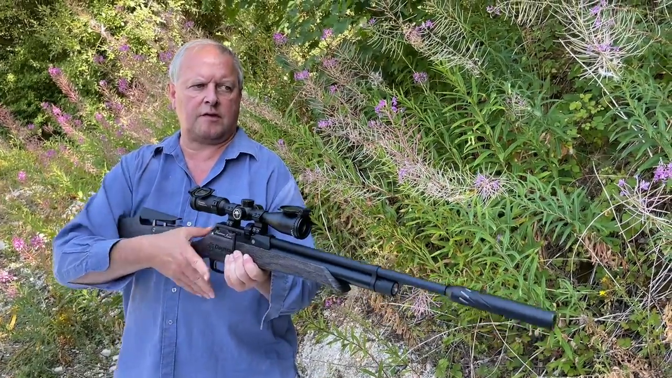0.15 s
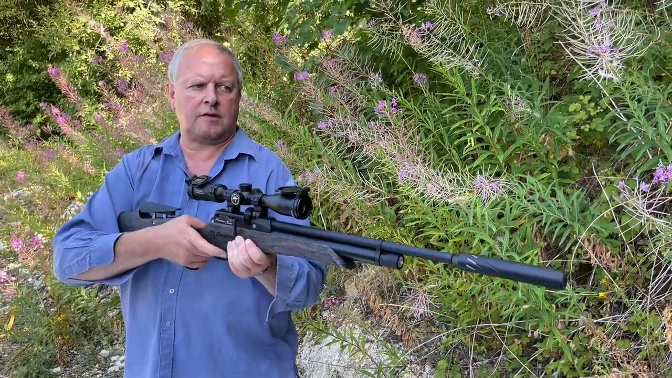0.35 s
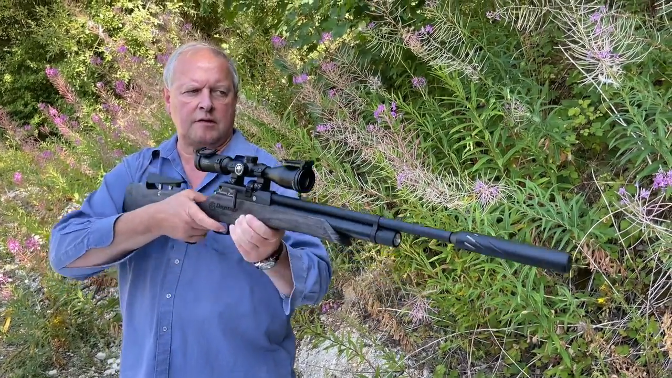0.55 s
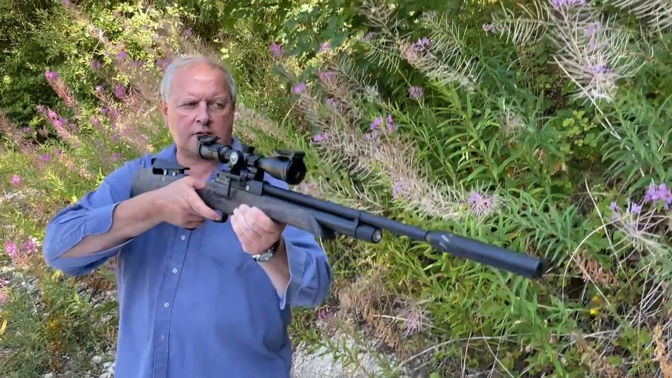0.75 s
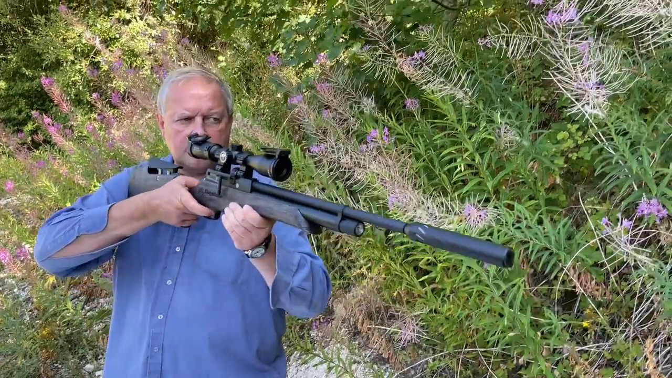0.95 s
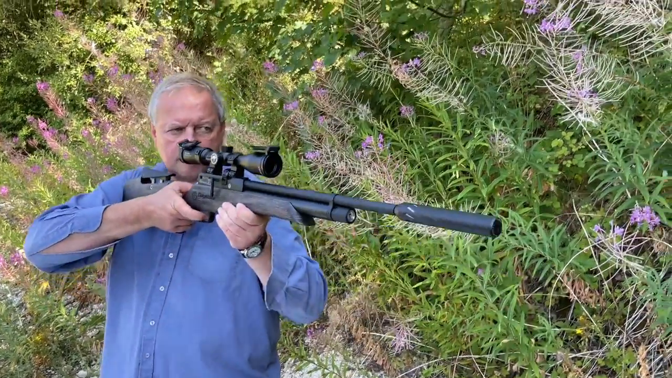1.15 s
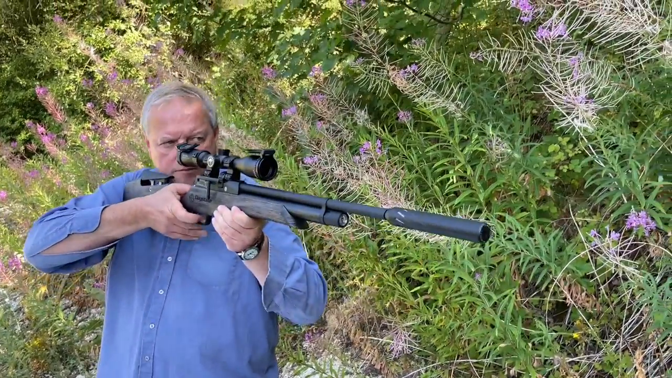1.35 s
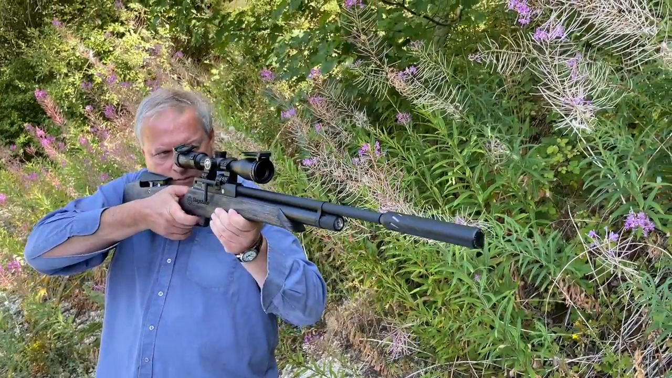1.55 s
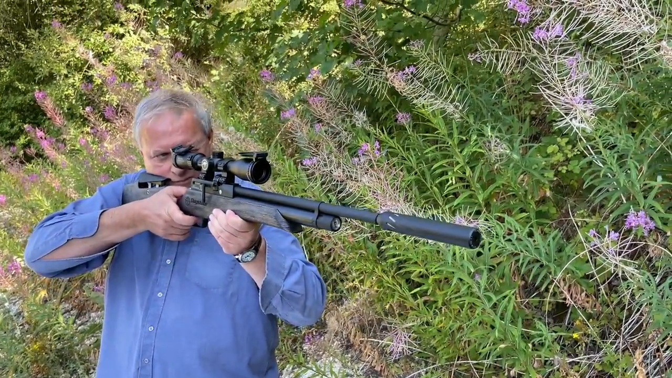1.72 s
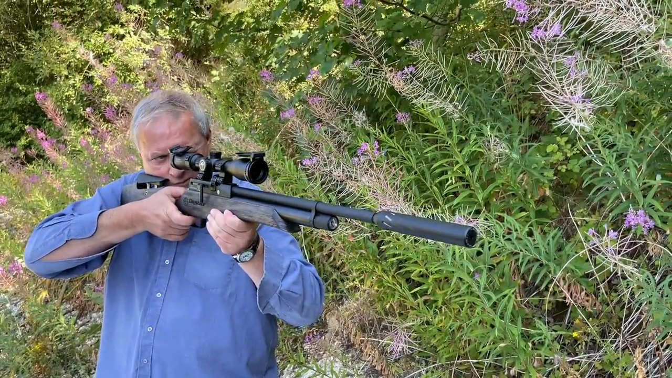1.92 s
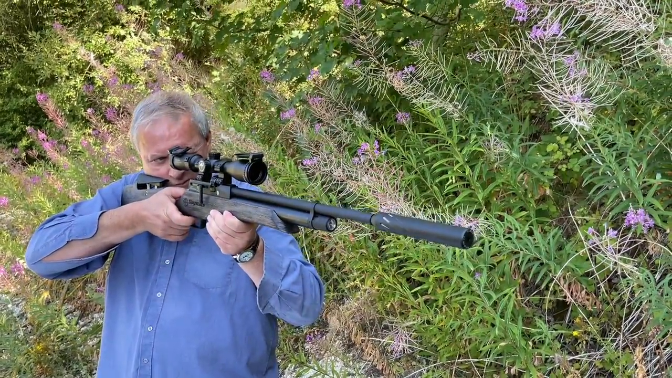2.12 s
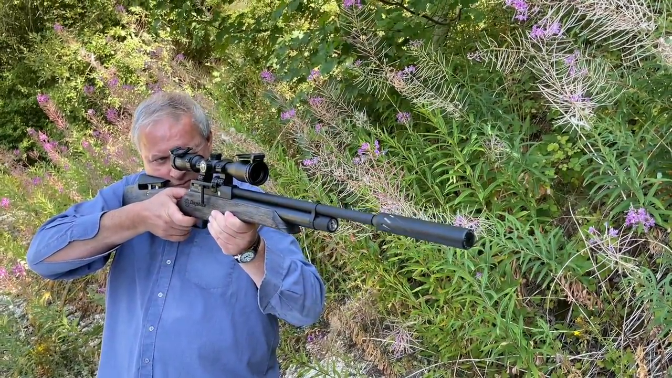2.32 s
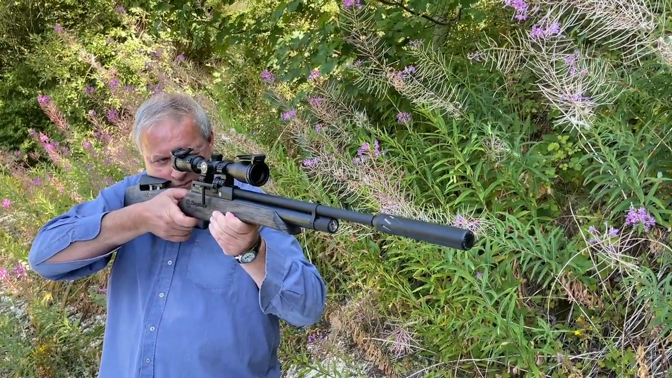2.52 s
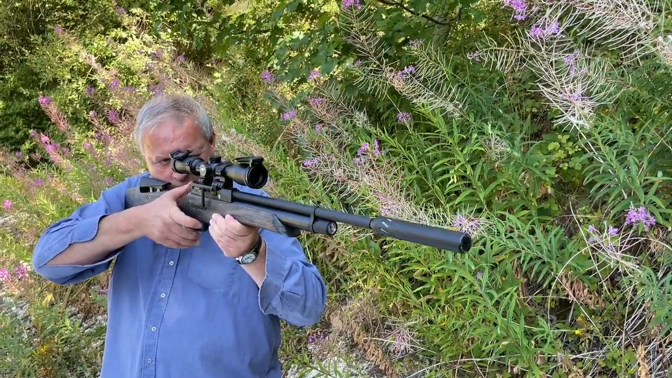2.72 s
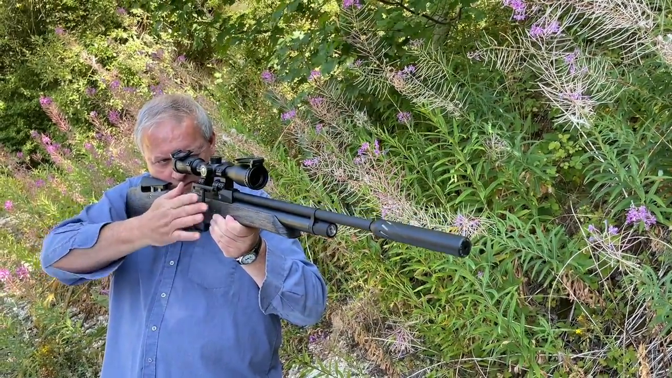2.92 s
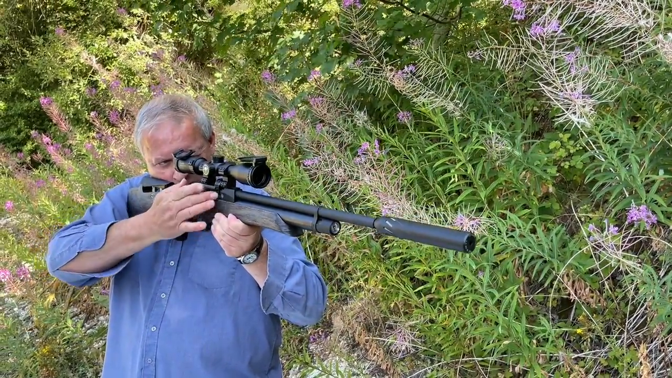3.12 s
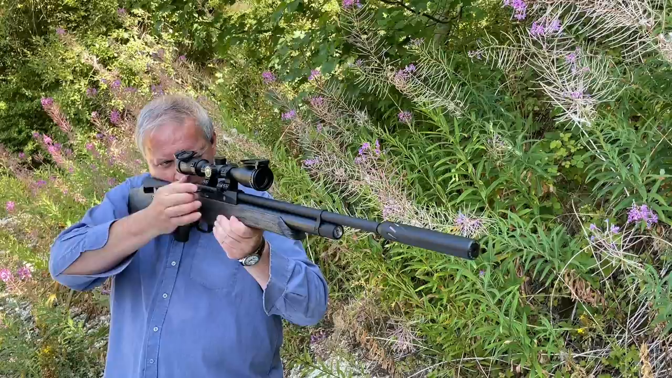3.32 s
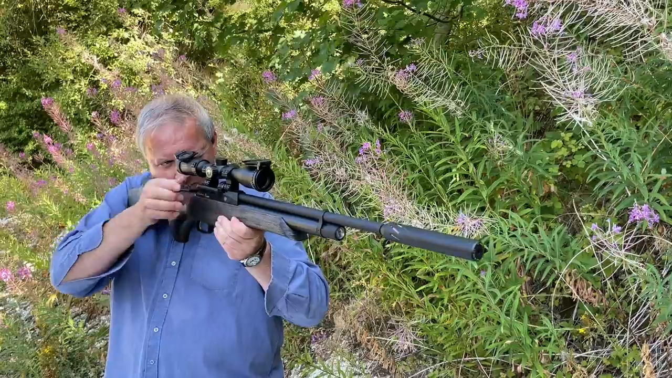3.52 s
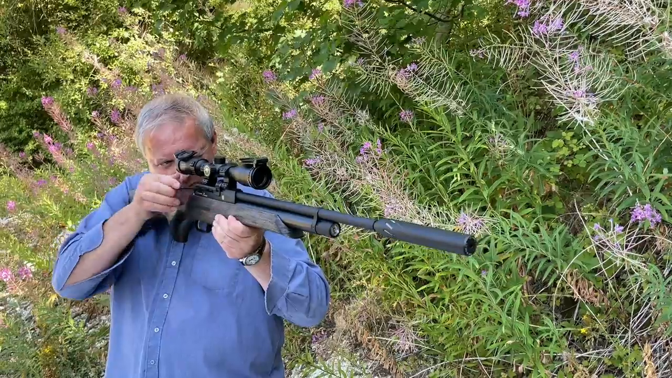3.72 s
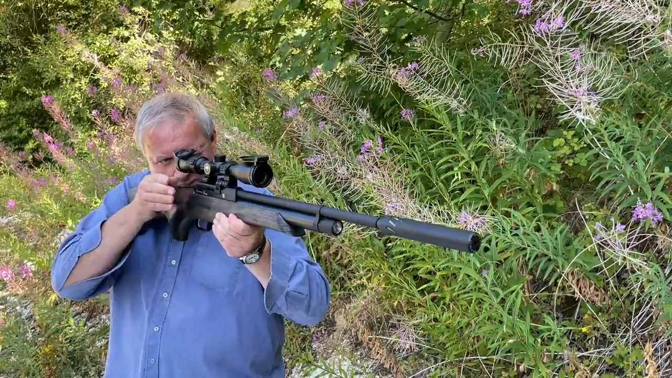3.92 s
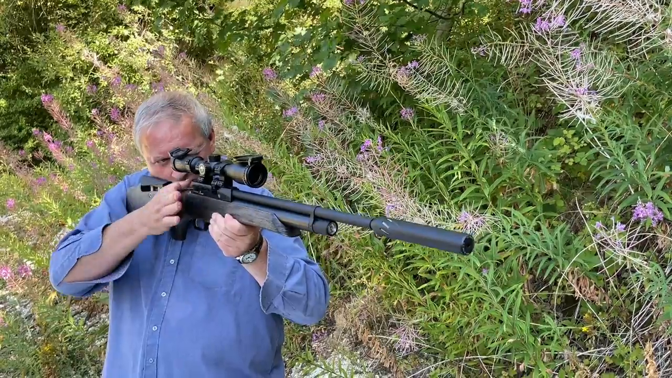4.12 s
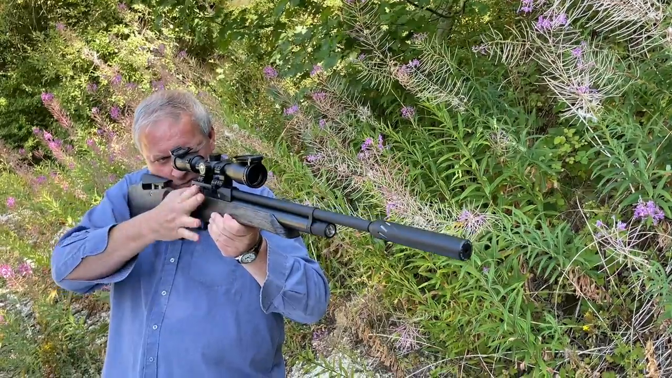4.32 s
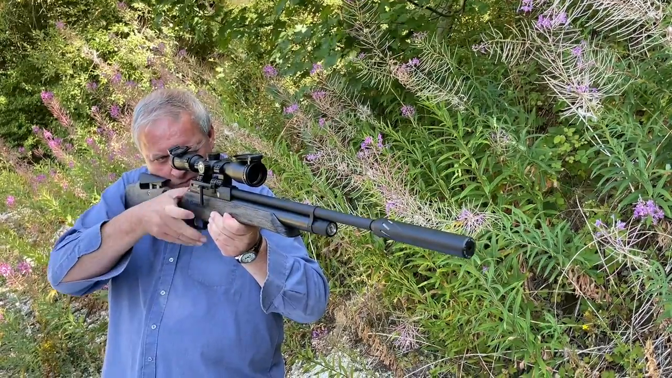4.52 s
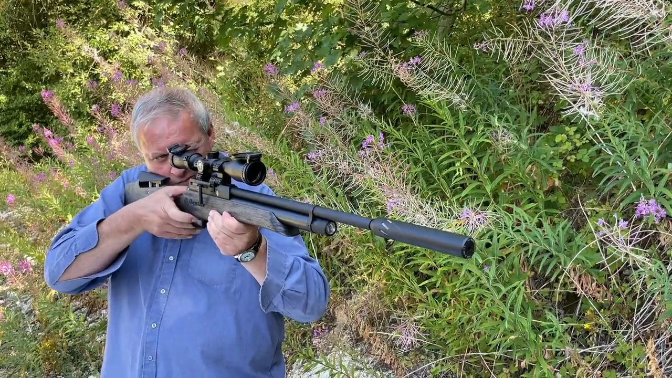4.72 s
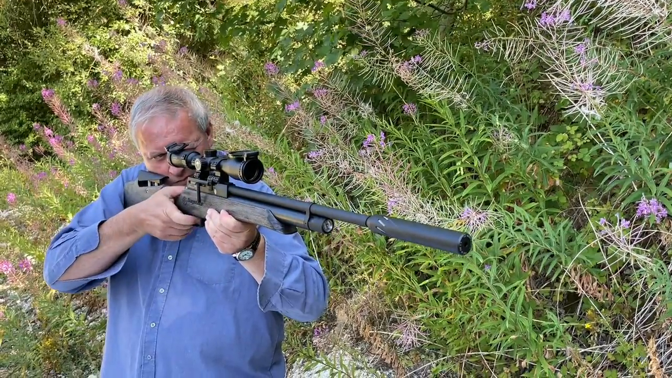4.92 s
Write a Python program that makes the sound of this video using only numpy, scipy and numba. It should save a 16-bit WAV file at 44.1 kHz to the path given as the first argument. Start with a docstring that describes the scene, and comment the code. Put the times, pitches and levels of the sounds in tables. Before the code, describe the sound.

A hard steel snap opens the scene, followed by near silence with light wind and a very faint low engine. At about 2.4 seconds a silenced air rifle fires once, a dense dry crack overloading the microphone, with venting air and a brief leafy wash. Then come rubbing bolt strokes, a cluster of clacks, small magazine clicks and a firm closing snap, outdoors in front of dense greenery.

```python
"""Before a bushy bank outdoors, a silenced air rifle is fired once, loud enough to clip.
Its side lever snaps shut at the start; after the shot it is drawn back, the magazine turns, and it is pushed home.
Contacts are noise pushes into resonances, strokes are grains with a gliding pitch, the shot is noise bursts
ringing a barrel; bushes and trees return washes of noise. Shaped noise is the light wind, and three
wandering harmonics are a far engine."""
import sys
import numpy as np
from scipy import signal
from scipy.fft import rfft, irfft, next_fast_len
from scipy.io import wavfile
from numba import njit

SR = 44100
rng = np.random.default_rng(int(sys.argv[2]) if len(sys.argv) > 2 else 0)


def write(x):
    x = np.atleast_2d(x).T
    wavfile.write(sys.argv[1], SR, np.round(np.clip(x, -1, 1) * 32767).astype(np.int16))


N = 223099
T = np.arange(N) / SR


def from_db(db):
    """Decibels to gain."""
    return 10 ** (np.asarray(db) / 20)


def rms_one(x):
    """Scale to rms 1."""
    return x / np.sqrt(np.mean(x ** 2) + 1e-20)


def at_hz(points, hz, axis=1):
    """Read a table column on a log-frequency axis."""
    points = np.array(points)
    return np.interp(np.log(hz + 1e-3), np.log(points[:, 0]), points[:, axis])


def cut(x, hz, kind, order=2):
    """Causal Butterworth filter."""
    edges_hz = np.clip(hz, 10, .47 * SR)
    sos = signal.butter(order, edges_hz, kind, fs=SR, output="sos")
    return signal.sosfilt(sos, x + 1e-18)


def noise(colour=None):
    """Noise, white or with a given spectrum at rms 1."""
    white = rng.standard_normal(N)
    if colour is None:
        return white
    size = next_fast_len(N)
    gain = from_db(at_hz(colour, np.fft.rfftfreq(size, 1 / SR)))
    return rms_one(irfft(rfft(white, size) * gain, size)[:N])


def noise_band(low_hz, high_hz):
    """Band-passed noise of rms 1."""
    return rms_one(cut(noise(), [low_hz, high_hz], "band"))


def swell(start_s, rise_s, t60_s, t=T):
    """A straight rise, then an exponential decay."""
    age = t - start_s
    return np.clip(age / rise_s, 0, 1) * from_db(-60 * np.maximum(age - rise_s, 0) / t60_s)


def flutter(depth_db, rate_hz):
    """A gain that wanders at random around 1."""
    return from_db(depth_db * rms_one(cut(noise(), rate_hz, "low")))


def resonate(x, modes):
    """Parallel two-pole resonances, each with peak gain 1 before its own level."""
    out = 0
    for hz, width_hz, db in modes:
        r = np.exp(-np.pi * width_hz / SR)
        poles = [1, -2 * r * np.cos(2 * np.pi * hz / SR), r * r]
        out = out + from_db(db) * (1 - r * r) / 2 * signal.lfilter([1, 0, -1], poles, x + 1e-18)
    return out


@njit
def glide(x, angle, r):
    """A resonance whose centre moves sample by sample."""
    y = np.zeros(len(x))
    for i in range(2, len(x)):
        drive = (1 - r * r) / 2 * (x[i] - x[i - 2])
        y[i] = drive + 2 * r * np.cos(angle[i]) * y[i - 1] - r * r * y[i - 2]
    return y


# wind and leaf spectrum: (frequency [Hz], density [dB per Hz, relative])
AIR_COLOUR = [(8, -8.5), (14, 6), (24, -6.5), (37, -16.5), (58, -10), (100, -23), (190, -32.5),
              (330, -37.5), (550, -42.5), (1000, -42.5), (2100, -48.5), (6000, -53), (15500, -56.5)]
# breeze strength, used relative to its median: (time [s], level [dB])
BREEZE = [(0.2, -66.5), (2.1, -71.5), (2.42, -69.5), (2.93, -70), (3.8, -69.5), (5.0, -71)]
AIR_DB = -63.5  # level above 180 Hz at median breeze


def outdoors(air_db=0, gust_share=.6):
    """Wind rumble and leaf hiss follow a share of the breeze's swing in dB."""
    time_s, breeze_db = np.transpose(BREEZE)
    gust_db = gust_share * np.interp(T, time_s, breeze_db - np.median(breeze_db))
    air = noise(AIR_COLOUR)
    hiss_rms = np.std(cut(air, 180, "high", order=6))
    return air * from_db(AIR_DB + air_db + gust_db) / hiss_rms


# engine level, one list before the shot and one after: (time [s], level [dB])
ENGINE_LEVEL = [
    [(0.1, -60), (1.07, -78), (1.28, -65.5), (2.3, -66.5)],
    [(2.6, -63.5), (3.67, -67.5), (4.33, -55.5), (5.0, -70)],
]
# engine harmonics: (harmonic [number], level [dB, relative])
ENGINE_ORDERS = [(1, -6), (2, 0.5), (3, -8.5)]
ENGINE_HZ, ENGINE_WANDER_HZ, ENGINE_WANDER_S = 81.8, 0.31, 0.26


def engine(level_db=0):
    """A far engine at nearly steady speed hums on three harmonics and fades in and out."""
    knots_s = np.arange(0, T[-1] + 1, ENGINE_WANDER_S)
    wander = np.interp(T, knots_s, noise()[:len(knots_s)])
    phase = 2 * np.pi * np.cumsum(ENGINE_HZ + ENGINE_WANDER_HZ * wander) / SR
    hum = sum(from_db(db) * np.sin(round(k) * phase + rng.uniform(0, 2 * np.pi))
              for k, db in ENGINE_ORDERS)
    fade_db = np.interp(T, *np.vstack(ENGINE_LEVEL).T)
    return np.sqrt(2) * from_db(level_db + fade_db) * hum


# shot returned by farther trees: (time [s], level [dB], rise [s], t60 [s])
ECHOES = [(2.46, -49.5, 0.048, 0.68), (2.71, -75, 0.047, 0.26)]
# echo spectrum: (frequency [Hz], level [dB, relative])
ECHO_COLOUR = [(300, -21), (900, 2), (2000, 1), (4000, 5), (8500, 6), (11000, 1.5), (16000, -16)]


def trees(patchy_db=2.0):
    """Distant foliage returns the shot as an uneven noise wash that has lost its top."""
    wash = sum(from_db(db) * swell(s, rise_s, t60_s) for s, db, rise_s, t60_s in ECHOES)
    return wash * noise(ECHO_COLOUR) * flutter(patchy_db, 64)


# scatter from the bushes: (frequency [Hz], level [dB, relative], t60 [s])
BUSHES = [(200, -7, 0.18), (810, 0, 0.23), (2000, -5, 0.21), (4860, -2, 0.21), (8356, 1, 0.27),
          (16185, -4.5, .19)]


def bushes(x, near_db=-10, near_t60_s=0.031, far_db=-15, far_rise_s=0.0017):
    """Ground gives a quick dense echo; stirring leaves return each band's energy as a dying wash."""
    t = T[:SR // 2]
    ground = cut(rng.standard_normal(len(t)), 12000, "low") * swell(0.0018, 0.0025, near_t60_s, t)
    out = from_db(near_db) * signal.fftconvolve(x, ground / np.linalg.norm(ground))[:N]
    edges_hz = np.geomspace(200, 16000, 13)
    for low_hz, high_hz in zip(edges_hz, edges_hz[1:]):
        mid_hz = np.sqrt(low_hz * high_hz)
        decay = swell(0.0082, far_rise_s, at_hz(BUSHES, mid_hz, axis=2), t) ** 2  # energy
        band_energy = cut(x, [low_hz, high_hz], "band") ** 2
        energy = signal.oaconvolve(band_energy, decay / decay.sum())[:N]
        gain = from_db(far_db + at_hz(BUSHES, mid_hz))
        out += gain * np.sqrt(np.abs(energy)) * noise_band(low_hz, high_hz)
    return out


# finger ticks on the gun: (time [s], level [dB], frequency [Hz], t60 [s])
TICKS = [(0.141, -54, 8900, 0.0053), (1.147, -43, 4580, 0.0084)]
# soft handling bumps: (time [s], level [dB], frequency [Hz], t60 [s])
BUMPS = [(0.205, -43, 117, 0.13), (3.535, -41.5, 107, 0.13)]


def handling(rows, spread=1.12):
    """Damped touches, each a narrow noise band that dies fast."""
    return sum(from_db(db) * noise_band(hz / spread, hz * spread) * swell(s, t60_s / 10, t60_s)
               for s, db, hz, t60_s in rows)


# stock, action and air tube: (frequency [Hz], width [Hz], level [dB, relative])
RIFLE_MODES = [(390.6, 35, -2.5), (669, 130, -6), (773, 70, 2), (1174, 1000, -5.5), (1394, 260, 5.5),
               (1642, 110, 0), (1843, 220, -1), (2350, 110, -6), (2790, 310, -1.5), (3230, 300, -1),
               (3975, 460, -6), (4790, 1200, 1), (5470, 680, -2), (6080, 350, -2), (7900, 710, 0),
               (8300, 480, -3.5), (8950, 870, 1)]
# small springs in the action: (frequency [Hz], width [Hz], level [dB, relative])
SPRING_MODES = [(9200, 90, -10), (11090, 28, 6), (11260, 50, 1), (13400, 140, -4)]
# hand strokes, lever gripped, lifted, bolt drawn back, cocked, pushed home:
# (start [s], end [s], level [dB], mid-stroke rub pitch [Hz])
SLIDES = [(3.068, 3.149, -64, 1700), (3.188, 3.255, -57, 1692), (3.309, 3.452, -51.5, 1816),
          (3.561, 3.64, -48, 1630), (3.99, 4.23, -58, 3300)]
# rub spectrum: (frequency [Hz], level [dB, relative])
SLIDE_COLOUR = [(400, -16), (1000, -2.5), (1650, 4.5), (2100, 3.5), (3000, 4.5), (5500, 3), (9000, -5.5),
                (12000, -12), (16000, -15)]
STROKE_ATTACK_S, STROKE_RELEASE_S, STROKE_REST_HZ = 0.023, .025, 1547


def slides(level_db=0.0, grit_db=1.5, catch_db=3.0, spring_db=8, spring_flutter_db=3, pitch_db=3,
           pitch_width_hz=450):
    """The bolt rubs its guide in grains; pitch arches per stroke, strong strokes favour the springs."""
    grains = noise(SLIDE_COLOUR) * flutter(grit_db, 241) * flutter(catch_db, 34)
    speed, hz = 0, STROKE_REST_HZ
    for start_s, end_s, db, mid_hz in SLIDES:
        attack = np.clip((T - start_s) / STROKE_ATTACK_S, 0, 1)
        release = np.clip(1 - (T - end_s) / STROKE_RELEASE_S, 0, 1)
        speed = speed + from_db(db) * attack * release
        arch = np.sin(np.pi * np.clip((T - start_s) / (end_s - start_s), 0, 1)) ** 2
        hz = hz + (mid_hz - STROKE_REST_HZ) * arch
    pitched = glide(grains, 2 * np.pi * hz / SR, np.exp(-np.pi * pitch_width_hz / SR))
    shake = grains * flutter(spring_flutter_db, 25) * speed / speed.max()
    springs = resonate(shake, SPRING_MODES)
    body = resonate(grains, RIFLE_MODES)
    rub = rms_one(body + from_db(pitch_db) * pitched + from_db(spring_db) * springs)
    return from_db(level_db) * speed * rub


# lever, bolt and magazine contacts; hard = steel on steel, soft = a stop against the stock:
# (time [s], level [dB, relative], hardness [dB], spring ring [dB, relative])
CONTACTS = [(0.0028, -9.5, 1, -28.5), (3.119, -56, 8, -6), (3.2325, -44.5, -0.5, -20), (3.4279, -41, 9, 7),
            (3.4465, -26, -8, -25), (3.6186, -28, 10.5, -6), (3.6355, -22.5, 8.5, -26),
            (3.6466, -26, -9.5, -26), (3.8567, -41, 6, -23), (3.862, -30, -14, -26),
            (3.9224, -44.5, -4.5, -20), (3.9491, -47.5, -1.5, -21), (3.981, -45, 10, 7),
            (4.0185, -42.5, -1.5, -11), (4.0705, -42, 2.5, -3), (4.2327, -13, 5.5, -25)]
# rattle t60 at the reference level; it doubles for each further drop of RATTLE_DOUBLES_DB
RATTLE_S, RATTLE_AT_DB, RATTLE_DOUBLES_DB = .018, -25.5, 45
# struck part: pitch at hardness 0, hardness per octave
PART_HZ, PART_OCTAVE_DB = 2270, 12.5
REBOUND_S, REBOUND_DB = .007, -17.5


def contacts(level_db=4, knock_db=9, spring_db=12, part_db=-1, part_width_hz=320, crack_db=-13,
             rise_s=0.00065, thud_db=-2, steel_db=-5, thud_hz=1500, steel_hz=4200, top_hz=13000):
    """Knock, rattle and one rebound; soft contacts move the stock, hard ones the steel."""
    force, springs, parts = np.zeros((3, N))
    t = T[:SR // 8]
    for s, db, hard_db, ring_db in CONTACTS:
        rattle_s = RATTLE_S * 2 ** ((RATTLE_AT_DB - db) / RATTLE_DOUBLES_DB)
        envelope = swell(0, rise_s, rattle_s, t)
        envelope += from_db(REBOUND_DB) * swell(REBOUND_S, rise_s, rattle_s, t)
        push = rng.standard_normal(len(t)) * envelope
        push[round(rise_s * SR)] += from_db(knock_db)
        push *= from_db(db)
        span = slice(round(s * SR), round(s * SR) + len(t))
        force[span] += from_db(thud_db - hard_db) * cut(push, thud_hz, "low", order=1)
        force[span] += cut(push, [thud_hz, steel_hz], "band", order=1)
        force[span] += from_db(steel_db + hard_db) * cut(push, steel_hz, "high", order=1)
        part_hz = PART_HZ * 2 ** (hard_db / PART_OCTAVE_DB)
        parts[span] += resonate(push, [(part_hz, part_width_hz, part_db)])
        springs[span] += from_db(ring_db) * push
    body = cut(resonate(force, RIFLE_MODES) + parts + from_db(crack_db) * force, top_hz, "low")
    return from_db(level_db) * body + from_db(spring_db) * resonate(springs, SPRING_MODES)


def spring_song(level_db=-24, hz=11150, half_width_hz=130, t60_s=.3, knee=1.5):
    """The hammer spring sings on, as narrow noise, after the contacts that shake it most."""
    shaken = sum(from_db(db + knee * ring_db) * swell(s, .002, t60_s)
                 for s, db, hard_db, ring_db in CONTACTS)
    return from_db(level_db) * shaken * noise_band(hz - half_width_hz, hz + half_width_hz)


# air tube ring: (frequency [Hz], level [dB, relative], t60 [s])
TUBE_MODES = [(365, -0.5, 0.12), (1630, -4.5, 0.17), (3360, -16.5, 0.26), (4813, -1.5, 0.17),
              (8100, 3, 0.117), (8926, 0, 0.14)]


def tube(level_db=-33, rise_s=.004, q=30):
    """The first lever snap alone rings the air tube: narrow noise bands, like clusters of close modes."""
    t, snap = T[:SR // 2], np.zeros(N)
    snap[round(CONTACTS[0][0] * SR)] = from_db(level_db)
    ring = 0
    for hz, db, t60_s in TUBE_MODES:
        cluster = rms_one(resonate(rng.standard_normal(len(t)), [(hz, hz / q, 0)]))
        ring = ring + from_db(db) * cluster * swell(0, rise_s, t60_s, t)
    return signal.oaconvolve(snap, ring)[:N]


# air leaving the silencer: (frequency [Hz], density [dB per Hz, relative])
VENT_COLOUR = [(240, -50.5), (400, -16.5), (569, -19.5), (809, -26), (847, -10), (928, -20), (1070, -15),
               (2030, -9), (2880, -10), (8930, 2), (15500, -5.5)]
SHOT_S = 2.3875


def vent(level_db=-12, rise_s=0.029, t60_s=0.22, top_t60_s=0.12, top_hz=11000):
    """The silencer empties with a hiss whose top dies sooner."""
    hiss = noise(VENT_COLOUR)
    main = cut(hiss, top_hz, "low", order=3) * swell(SHOT_S, rise_s, t60_s)
    top = cut(hiss, top_hz, "high", order=3) * swell(SHOT_S, rise_s, top_t60_s)
    return from_db(level_db) * (main + top)


# hammer, air blast, pellet strike and rebounds:
# (time [s], level [dB, relative], rise [s], t60 [s], low edge [Hz])
BURSTS = [(2.3821, -10, 0.0039, 0.067, 2500), (2.3861, 9, .0012, .026, 132), (2.3922, 1, 0.0014, 0.03, 615),
          (2.4012, -6.5, .0006, .01, 1184), (2.4131, 3, 0.00084, 0.0044, 7000),
          (2.4174, -11.5, 0.00069, 0.01, 1194)]
# blast spectrum: (frequency [Hz], level [dB, relative])
BLAST_COLOUR = [(100, 0.5), (350, 0.5), (700, 5.5), (1050, -2), (2000, -0.5), (4000, -1.5), (5500, 1.5),
                (9500, 0.5), (12000, -2.5), (16000, -8)]
# barrel and silencer ring: (frequency [Hz], width [Hz], level [dB, relative])
BARREL_MODES = [(630, 120, -5), (1275, 91, 1.5), (1564, 110, -2.5), (1848, 110, 2.5), (2637, 94, 2),
                (3080, 60, -0.5), (5010, 55, 1.5), (5790, 38, 0.5), (6140, 56, -1.5), (7650, 31, -1.5),
                (9360, 460, 2.5)]


def shot(ring_db=1, puff_db=10, puff_s=0.00037, thump_db=-18, thump_t60_s=0.095):
    """Noise bursts ring the barrel; the muzzle's air slug adds one negative pressure pulse and a thump."""
    rush = sum(from_db(db) * cut(noise(BLAST_COLOUR), low_hz, "high") * swell(s, rise_s, t60_s)
               for s, db, rise_s, t60_s, low_hz in BURSTS)
    age = (T - SHOT_S - puff_s) / puff_s
    puff = -from_db(puff_db) * np.exp(-age ** 2)
    thump = from_db(thump_db) * noise_band(70, 260) * swell(SHOT_S, 0.00061, thump_t60_s)
    return 0.77 * rush + from_db(ring_db) * resonate(rush, BARREL_MODES) + puff + thump


def scene(blast_scatter_db=-12, action_scatter_db=-2.0, scatter_top_hz=12000):
    """Rifle, bank scatter and open air; the muzzle points away, so the bank gets less blast."""
    action = contacts() + slides() + handling(TICKS, spread=1.16)
    blast = shot()
    action_to_bank = from_db(action_scatter_db) * cut(action, scatter_top_hz, "low")
    scatter = bushes(action_to_bank + from_db(blast_scatter_db) * blast)
    rifle = action + tube() + spring_song() + blast + vent() + handling(BUMPS, spread=1.15)
    return (rifle + scatter + trees() + outdoors() + engine())[None]


CUTOFF_HZ = 15800


def record(dry):
    """The microphone overloads: peaks clip flat at 0.95, then a steep low-pass cuts the top."""
    low_pass = signal.ellip(10, .1, 70, CUTOFF_HZ, fs=SR, output="sos")
    return signal.sosfilt(low_pass, np.clip(dry, -.95, .95))


dry = scene()
out = record(dry)
write(out)
```